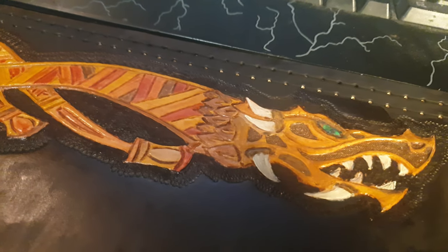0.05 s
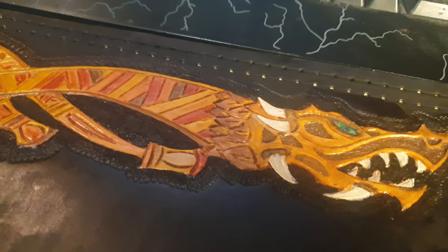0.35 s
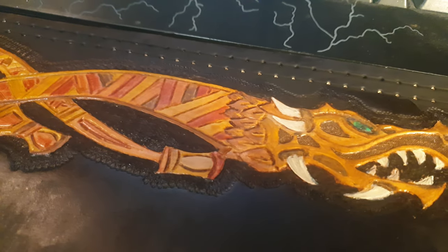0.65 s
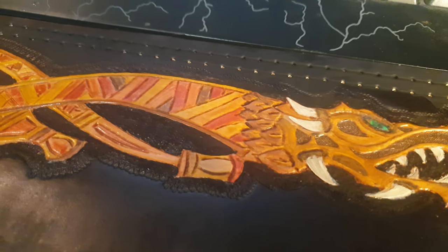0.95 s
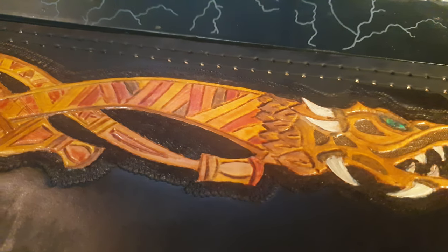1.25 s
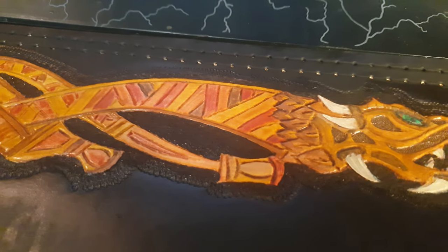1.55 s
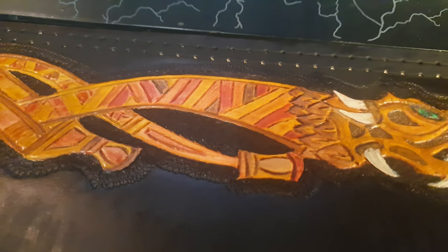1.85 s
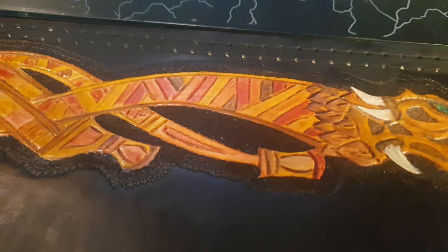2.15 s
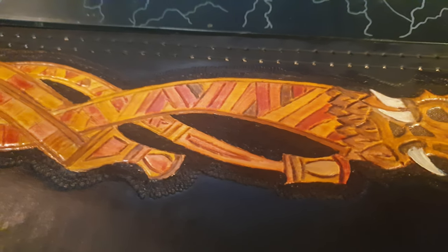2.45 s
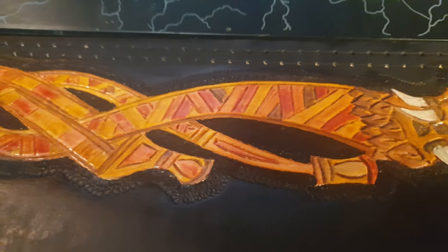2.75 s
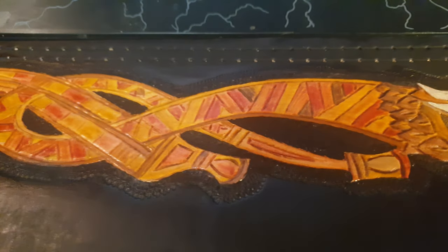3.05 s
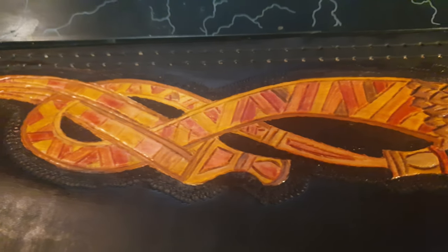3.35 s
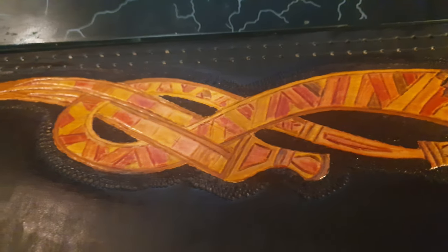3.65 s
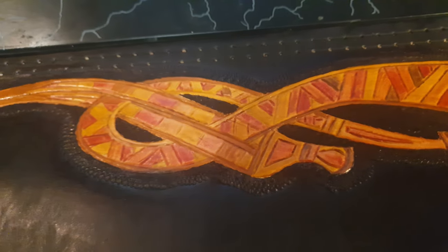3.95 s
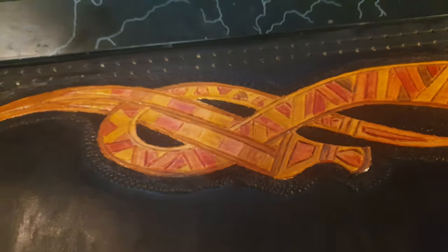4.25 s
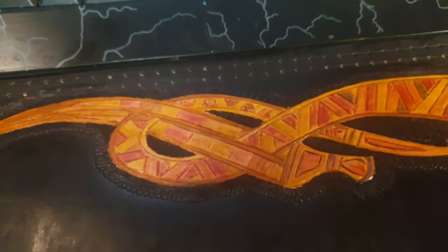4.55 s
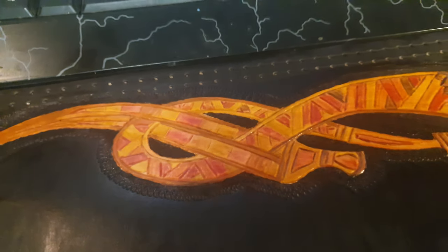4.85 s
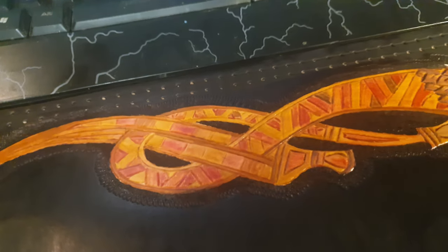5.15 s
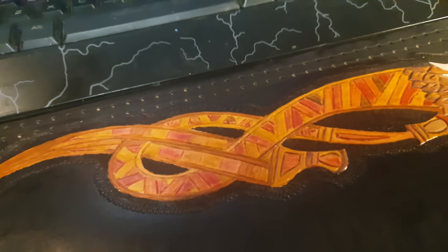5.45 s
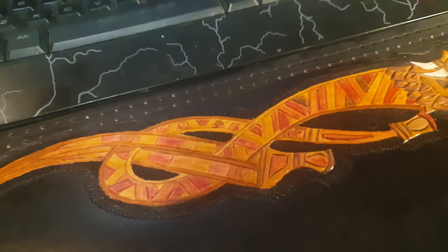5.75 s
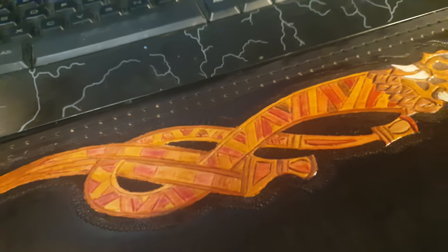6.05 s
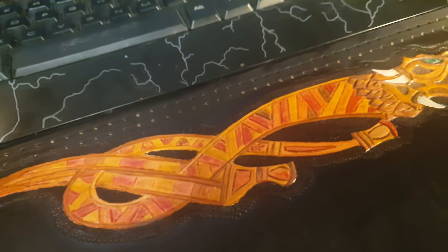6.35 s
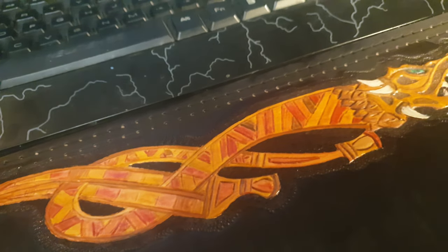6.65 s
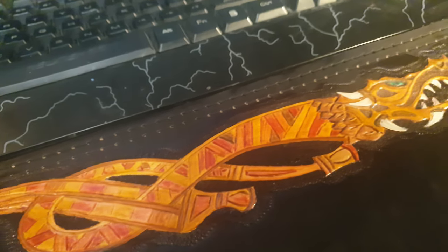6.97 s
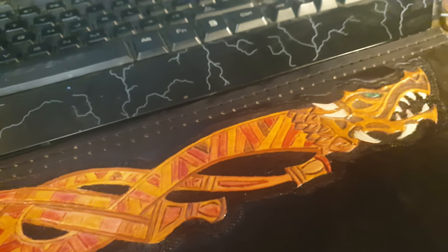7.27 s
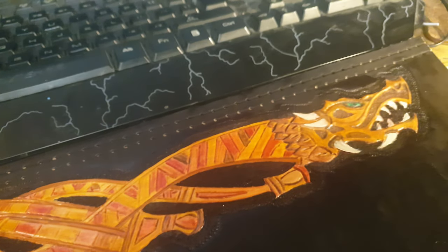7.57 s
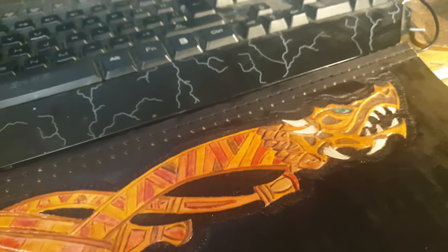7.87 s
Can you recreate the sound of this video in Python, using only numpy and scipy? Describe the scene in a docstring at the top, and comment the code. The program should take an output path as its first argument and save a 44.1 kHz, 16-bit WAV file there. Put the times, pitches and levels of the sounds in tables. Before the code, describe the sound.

Soft, deep handling rumble from a phone held in the hand sits over a low, steady fan hum indoors. About a third of the way in, loud, very close bumps and stuttering scrapes hit the right side as a fingertip drags over the microphone, fading into a fine hiss. The palm then rubs the case faintly, and several dull knocks come through the phone, most of them toward the end.

```python
"""A room with a fan humming in the background, heard from a phone hand-held over tooled leather on a desk.
The grip rumbles softly through the case into both microphones, and now and then the phone takes a soft
knock. Closest of all, a fingertip bumps onto the right microphone port, judders as the skin sticks and
slips, scrapes across it in a few jerks and glides off its rim with a thin hiss."""
import sys
import numpy as np
from scipy import signal
from scipy.fft import rfft, irfft, next_fast_len
from scipy.io import wavfile

SR = 44100
rng = np.random.default_rng(int(sys.argv[2]) if len(sys.argv) > 2 else 0)


def wav_out(sig):
    """Save sig, one row per channel (or a flat mono array), as 16-bit PCM at SR to the path in sys.argv[1]."""
    wavfile.write(sys.argv[1], SR, np.round(np.clip(np.atleast_2d(sig).T, -1, 1) * 32767).astype(np.int16))


N = 357651
T = np.arange(N) / SR


def undb(db):
    """Decibels to gain."""
    return np.exp(np.asarray(db) * np.log(10) / 20)


def unit(x):
    """Scale to rms 1."""
    return x / np.sqrt(np.mean(x ** 2))


def add(out, at, sound):
    """Mix a short sound in at a given time."""
    first = int(at * SR)
    out[first:first + len(sound)] += sound[:N - first]


def ramp(start, length):
    """Rise from 0 to 1 in a straight line."""
    return np.clip((T - start) / length, 0, 1)


def curve(rows, column):
    """One column of a timed table, joined by straight lines."""
    rows = np.array(rows)
    return np.interp(T, rows[:, 0], rows[:, column])


def colour(x, rows, column=1, tilt=0):
    """Filter by (frequency [Hz], gain [dB]) points, tilted in dB per octave around 1 kHz."""
    rows, size = np.array(rows), next_fast_len(len(x), real=True)
    octaves = np.log2(rows[:, 0] / 1000)
    grid_hz = np.geomspace(10, SR / 2, 400)
    gain = undb(np.interp(np.log2(grid_hz / 1000), octaves, rows[:, column] + tilt * octaves))
    response = np.interp(np.fft.rfftfreq(size, 1 / SR), grid_hz, gain)
    return irfft(rfft(x, size) * response, size)[:len(x)]


def noise(size=N):
    """White noise of rms 1."""
    return rng.standard_normal(size)


def wander(rate):
    """A random drift with a spread near 1, turning `rate` times a second."""
    return 1.198 * np.interp(T * rate, np.arange(SR // 10), noise(SR // 10))


def friction(rate, spread_db, size=N):
    """Tiny slips of unequal size at random moments, about `rate` a second."""
    slips = rng.random(size) < rate / SR
    return slips * noise(size) * undb(spread_db * noise(size))


def stroke(length, peak=0.47):
    """Speed of one slide: it swells, peaks at a share of its length and dies away."""
    progress = np.linspace(0, 1, int(length * SR))
    skew = np.log(.5) / np.log(np.clip(peak, .05, .95))
    return 1.25 * np.abs(np.sin(np.pi * progress ** skew)) ** 1.55


def swell(start, length, peak=0.49, sharpness=1):
    """One stroke placed in time; a low sharpness makes it fuller."""
    out = np.zeros(N)
    add(out, start, stroke(length, peak) ** sharpness)
    return out


def fan_tone(hz):
    """A fan tone that wavers in pitch and strength as the phone moves through the room."""
    phase = 2 * np.pi * np.cumsum(hz * (1 + 0.0085 * wander(22))) / SR
    return unit(np.sin(phase) * undb(3.2 * wander(7)))


# fan and room air at the two ports: (frequency [Hz], left [dB per Hz], right [dB per Hz])
ROOM_AIR = [(25, -103, -103), (48, -88.5, -83), (87, -88, -90.5), (134, -79.5, -81.5), (243, -81.5, -82),
            (337, -82.5, -85), (372, -92.5, -92.5), (740, -94, -94.5), (1120, -95, -89), (1398, -105, -99),
            (1745, -94, -100), (2010, -92.5, -105), (3275, -114, -118), (6400, -140, -134)]
# fan and motor tones out in the room: (frequency [Hz], left [dB], right [dB])
FAN_TONES = [(125.6, -70, -67.5), (315.7, -76.5, -67.5), (782.5, -76.5, -74.5), (898, -93, -87.5),
             (1044, -81, -77), (2330, -94, -100)]
# self-noise of each microphone: (frequency [Hz], level [dB per Hz])
MIC_HISS = [(1000, -121), (4500, -123.5), (7800, -131), (9500, -126.5), (11500, -120), (15500, -121)]


def room():
    """Background: fan wash, alike at both ports in the bass, with motor tones and microphone hiss."""
    # share of the wash's power that both ports have in common
    hz, share = np.transpose([(60, .77), (130, .99), (300, .79), (640, .75), (1400, .091), (3000, .043)])
    common = colour(noise(), np.c_[hz, 10 * np.log10(share)])
    tones, out = [fan_tone(row[0]) for row in FAN_TONES], []
    for side, lag in ((1, 11), (2, 0)):  # the fan reaches the left port 11 samples late
        air = np.roll(common, lag) + colour(noise(), np.c_[hz, 10 * np.log10(1 - share)])
        wash = colour(air, ROOM_AIR, column=side) + colour(noise(), MIC_HISS)
        hum = sum(tone * undb(row[side]) for tone, row in zip(tones, FAN_TONES))
        out.append(wash * np.sqrt(SR / 2) + hum)
    return np.array(out)


# the swaying phone at its own microphones: (frequency [Hz], gain [dB])
SWAY_SPECTRUM = [(24, -39), (36, 9.5), (44, 12), (56, -4), (120, -46)]


def sway(db):
    """The wrist turns and the phone sways with a very deep rumble."""
    motion = swell(start=3.87, length=1.94, peak=0.38, sharpness=0.25)
    return unit(colour(noise(), SWAY_SPECTRUM)) * motion * undb(db)


# slides of the hand on the back of the case: (time [s], length [s], left [dB], right [dB])
PALM_SLIDES = [(4.26, 0.54, -57, -61), (4.9, 0.33, -67, -74), (7.018, 0.18, -62.5, -70)]
# the palm heard through the case: (frequency [Hz], gain [dB])
PALM_SPECTRUM = [(150, -13), (400, 5.5), (700, 5), (1100, -7.5), (2200, -20), (4000, -49)]


def palm(side):
    """The palm rubs the case in dense little slips; side 1 is the left microphone, 2 the right."""
    out = np.zeros(N)
    for row in PALM_SLIDES:
        speed = stroke(row[1])
        rub = unit(colour(friction(rate=4000, spread_db=0.5, size=SR), PALM_SPECTRUM))
        add(out, row[0], rub[:len(speed)] * speed * undb(row[side + 1]))
    return out


# the steady hold on the phone: (time [s], left [dB], right [dB])
GRIP_LEVELS = [(0, -60, -58.5), (0.9, -69, -51.5), (2.0, -62, -56.5), (2.6, -53.5, -50.5),
               (3.35, -52.5, -56), (4.0, -52.5, -61), (5.3, -53, -60.5), (5.85, -56.5, -62),
               (6.05, -66.5, -71), (7.2, -61, -67), (7.7, -76, -75)]
# the fingers tighten for a moment: (time [s], length [s], left [dB], right [dB])
GRIP_SQUEEZES = [(0.4, 0.37, -58, -45), (0.95, 0.23, -58, -56), (1.333, 0.21, -52.5, -53.5),
                 (1.602, 0.22, -56, -47.5), (3.526, 0.24, -54, -51), (4.25, 0.24, -57, -49),
                 (5.385, 0.23, -67, -55.5), (6.28, 0.17, -69, -65), (7.0, 0.13, -55, -52),
                 (7.234, 0.34, -58, -60)]
# the grip as the case carries it to the microphones: (frequency [Hz], gain [dB])
CASE_SPECTRUM = [(22, -36), (42, 5), (70, 4), (130, -1.5), (220, -3), (320, -17), (500, -12.5),
                 (1000, -24.5), (2500, -68)]


def grip(side):
    """Small creeps of the fingers thud in the case, louder with each squeeze."""
    hold = undb(curve(GRIP_LEVELS, side))
    squeezes = [swell(row[0], row[1], sharpness=0.59) * undb(row[side + 1]) for row in GRIP_SQUEEZES]
    power = hold ** 2 + sum(squeeze ** 2 for squeeze in squeezes)
    return unit(colour(friction(rate=1100, spread_db=1.5), CASE_SPECTRUM)) * np.sqrt(power)


# soft knocks through the case: (time [s], left [dB], right [dB], thud [Hz], relative rattle [dB])
CASE_KNOCKS = [(0.511, -61, -32, 81, -28), (3.609, -50, -35, 85, -27), (4.979, -49, -58, 480, -4),
               (5.0134, -37.5, -46, 81, -24), (5.476, -40, -61, 122, -27), (7.0476, -38, -38.5, 169, -14.5),
               (7.288, -47, -40, 91, -18), (7.3808, -37, -34.5, 148, -11), (7.4934, -34.5, -31.5, 110, -14)]
# the case rattling around the microphones: (frequency [Hz], gain [dB])
RATTLE_SPECTRUM = [(100, -5), (550, 3), (1000, -6), (2000, -16), (4000, -43), (8000, -47), (12000, -35)]


def knocks():
    """Each blow rocks the case in the hand for a cycle or two and leaves a short dull rattle."""
    out, age = np.zeros((2, N)), T[:SR // 10]
    rattle_envelope = (1 - np.exp(-age / 0.0019)) * np.exp(-age / 0.017)
    for at, left_db, right_db, hz, rattle_db in CASE_KNOCKS:
        thud = -np.sin(2 * np.pi * hz * age) * np.exp(-(age * hz / 1.09) ** 2)
        for channel, db in zip(out, (left_db, right_db)):
            rattle = unit(colour(noise(len(age)), RATTLE_SPECTRUM)) * rattle_envelope
            add(channel, at, undb(db) * (0.86 * thud + undb(rattle_db) * rattle))
    return out


# the port's upper resonance under the finger: (frequency [Hz], gain [dB])
UPPER_COVERED = [(7500, -44), (9000, -14.5), (10300, -2), (12600, -0.5), (14500, -3.5), (16000, -12)]
# the same with the port open: (frequency [Hz], gain [dB])
UPPER_OPEN = [(7500, -50), (9000, -24), (10500, -10), (12500, -3.5), (14000, 0), (16000, -5)]


def upper_resonance(grain):
    """The port's upper resonance climbs as the finger uncovers it."""
    uncovered = ramp(start=4.06, length=0.36)
    covered = unit(colour(grain, UPPER_COVERED))
    return (1 - uncovered) * covered + uncovered * unit(colour(grain, UPPER_OPEN))


# the port's lower resonance with skin on the rim: (frequency [Hz], gain [dB])
LOWER_DAMPED = [(2500, -8.5), (3600, -17.5), (4600, -5.5), (5400, -2.5), (6800, -4.5), (8200, -15),
                (10000, -33)]


def lower_resonance(grain):
    """Damped by the skin at first, the lower resonance rings narrower and higher as the finger lifts."""
    damped = unit(colour(grain, LOWER_DAMPED))
    ringing = unit(colour(damped, [(3200, 0), (4800, -7.5), (6100, 1), (8000, -5)]))
    lifted = ramp(start=3.78, length=0.1)
    return (1 - lifted) * damped + lifted * ringing


# skin dragging at the edge of the port: (frequency [Hz], gain [dB])
DRAG_SPECTRUM = [(60, -26), (200, 6), (450, 3.5), (900, -1), (1400, -7.5), (2200, -17.5), (3500, -26),
                 (7000, -53)]


def skin_drag(ease_from_s=3.13, ease_s=0.42, pressed_db=17, light_db=-8):
    """A dull drag that fades as the finger eases off; its levels are relative to the glide's hiss."""
    pressure = np.exp(-np.maximum(T - ease_from_s, 0) / ease_s)
    drag_db = pressure * pressed_db + (1 - pressure) * light_db
    drag = unit(colour(friction(rate=2900, spread_db=-0.5), DRAG_SPECTRUM))
    return drag * undb(drag_db + 0.93 * wander(70))


# light strokes on the rim of the right port:
# (time [s], length [s], level [dB], relative lower resonance [dB], peak position [0-1])
RIM_GLIDES = [(2.81, 0.22, -70, -0.5, 0.53), (3.008, 0.12, -61.5, 0.5, 0.27),
              (3.127, 0.28, -60.5, -2, 0.21), (3.232, 0.15, -60.5, -4, 0.62),
              (3.372, 0.14, -59.5, -9, 0.43), (3.495, 0.22, -58, -6, 0.38), (3.673, 0.12, -56.5, -4, 0.62),
              (3.858, 0.1, -63, -7.5, 0.45), (4.019, 0.14, -59.5, -11, 0.41),
              (4.119, 0.26, -52.5, -11, 0.44), (4.25, 0.19, -59.5, -11, 0.35)]


def glide():
    """The finger glides on in short strokes; dull drag gives way to fine hiss in the port's resonances."""
    strokes = [(swell(at, length, peak, sharpness=0.58) * undb(db), lower_db)
               for at, length, db, lower_db, peak in RIM_GLIDES]
    graze = swell(start=2.9, length=1.7, sharpness=0.27) * undb(-71.5)  # skin contact between strokes
    strokes.append((graze, -12))
    level = np.sqrt(sum(speed ** 2 for speed, _ in strokes))
    lower_level = np.sqrt(sum((speed * undb(lower_db)) ** 2 for speed, lower_db in strokes))
    drag = skin_drag()
    grain = friction(rate=17000, spread_db=2) * undb(0.8 * wander(90))
    return (drag + upper_resonance(grain)) * level + lower_resonance(grain) * lower_level


PUSH_LEAD_S = .02  # from the start of a push to its middle


def push(contact_ms, leak_hz, edge):
    """A soft push squeezes the air in the port and lets go; the leak makes the pressure swing back."""
    pad_time = (T[:SR // 10] - PUSH_LEAD_S) * 1000 / contact_ms
    rim_time = 1.76 * (pad_time + 1)  # the skin meets the rim in a shorter tap at the front
    pressure = pad_time * np.exp(-pad_time ** 2 / 2) + edge * rim_time * np.exp(-rim_time ** 2 / 2)
    wave = signal.sosfilt(signal.butter(2, leak_hz, "high", fs=SR, output="sos"), pressure)
    return wave / np.abs(wave).max()


def judder(start, gap_s, quicken, peak_db, fade_db, contact_ms, count):
    """The pressed fingertip sticks and slips ever faster, hardest on the second slip and then lighter."""
    out, at = np.zeros(N), start
    for k in range(count):
        slip = push(contact_ms * quicken ** k, leak_hz=30, edge=0.63)
        add(out, at - PUSH_LEAD_S, slip * undb(peak_db - fade_db * abs(k - 1.3)))
        at += gap_s * quicken ** k
    return out


# bumps and snaps directly on the right port: (time [s], peak level [dB], contact time [ms])
PORT_BUMPS = [(2.7354, -13, 0.91), (2.7476, -20.5, 1.75), (2.7623, -19.5, 1.3), (2.788, -22.5, 1.53),
              (2.826, -26, 1.8), (2.8732, -28, 1.5), (2.8814, -24, 1.74), (2.9225, -17.5, 0.37),
              (2.9891, -19, 0.42), (3.1323, -29, 0.37)]
# jerks across it: (time [s], length [s], level [dB], brightness [dB per octave], peak position [0-1])
PORT_SCRAPES = [(2.7285, 0.086, -38.5, -5.5, 0.16), (2.835, 0.039, -26.5, -5, 0.37),
                (2.868, 0.042, -30, -0.45, 0.49), (2.916, 0.051, -34.5, 0.9, 0.41),
                (2.986, 0.046, -36.5, 0.7, 0.22), (3.009, 0.064, -51.5, 3, 0.72),
                (3.054, 0.006, -44, 1.5, 0.46), (3.13, 0.16, -45.5, -4, 0.22), (3.179, 0.0027, -51, 7, .4)]
# scraping skin, right at the microphone: (frequency [Hz], gain [dB])
SKIN_SPECTRUM = [(80, -1), (300, 2), (550, 2), (1100, -3), (2200, -11), (4000, -15.5), (5800, -17),
                 (7200, -24.5), (8500, -38), (10500, -24.5), (12500, -19.5), (15500, -23)]


def fingertip():
    """The fingertip lands on the port: bumps and a judder pump its air, and the skin scrapes in jerks."""
    out = judder(start=2.8345, gap_s=0.0074, quicken=.84, peak_db=-14.5, fade_db=2.5,
                 contact_ms=1.0, count=6)
    for at, db, contact_ms in PORT_BUMPS:
        add(out, at - PUSH_LEAD_S, undb(db) * push(contact_ms, leak_hz=38, edge=0.32))
    for at, length, db, brightness, peak in PORT_SCRAPES:
        speed = stroke(length, peak)
        grit = colour(friction(rate=12000, spread_db=1.5, size=SR // 2), SKIN_SPECTRUM, tilt=brightness)
        add(out, at, unit(grit[:len(speed)]) * speed * undb(db))
    return out


def scene():
    """Room and handling reach both microphones; only the right port is touched."""
    out = room()
    for channel, side, sway_db in zip(out, (1, 2), (-62, -64)):
        channel += grip(side) + sway(sway_db) + palm(side)
    out += knocks()
    out[1] += fingertip() + glide()
    return out


def record(dry, low_cut_hz=24, top_hz=15850):
    """The phone drops the deepest rumble and cuts the top."""
    dry = signal.sosfilt(signal.butter(2, low_cut_hz, "high", fs=SR, output="sos"), dry)
    return signal.sosfilt(signal.ellip(10, .2, 70, top_hz, fs=SR, output="sos"), dry)


dry = scene()
out = record(dry)
wav_out(out)
```